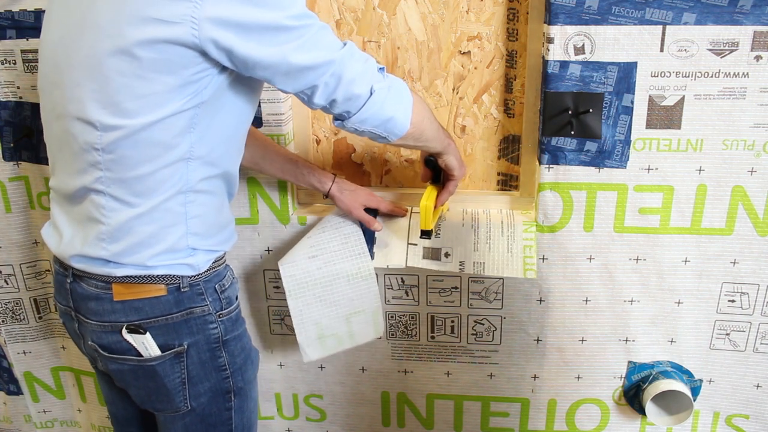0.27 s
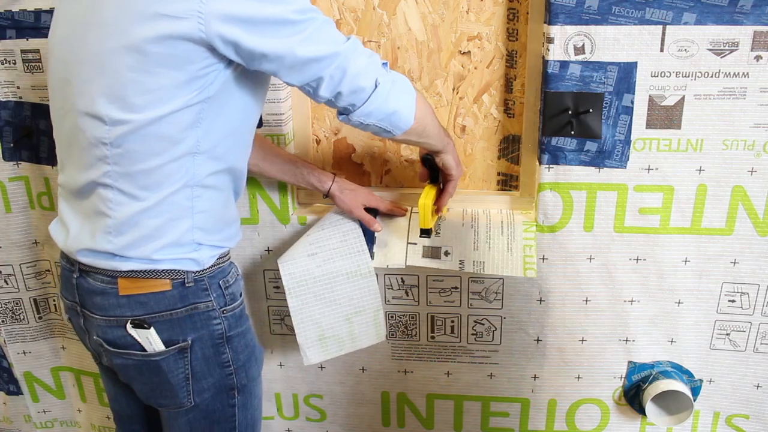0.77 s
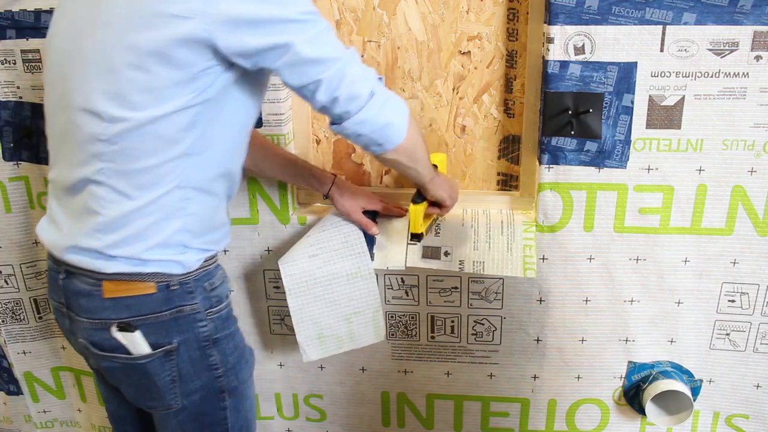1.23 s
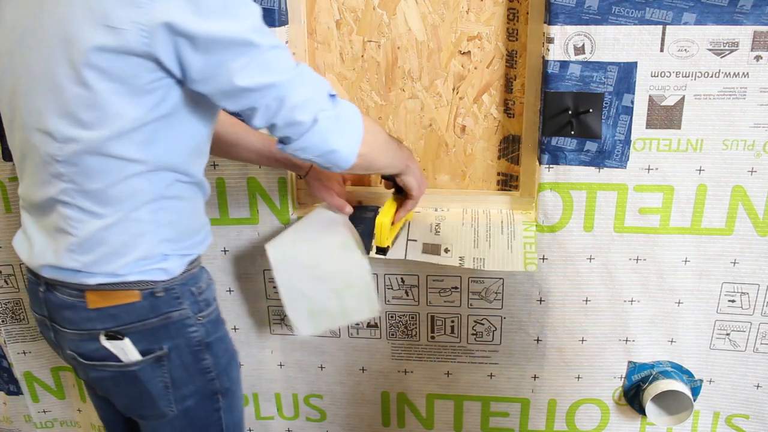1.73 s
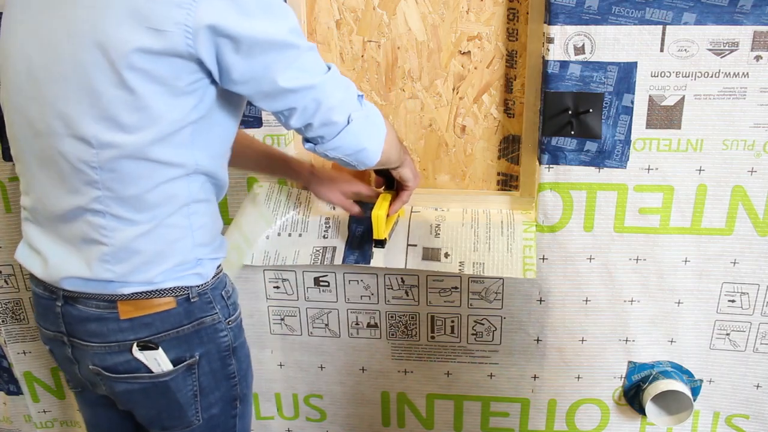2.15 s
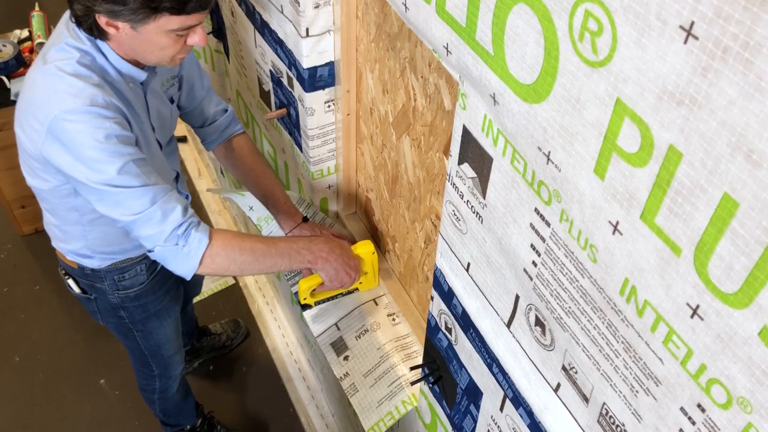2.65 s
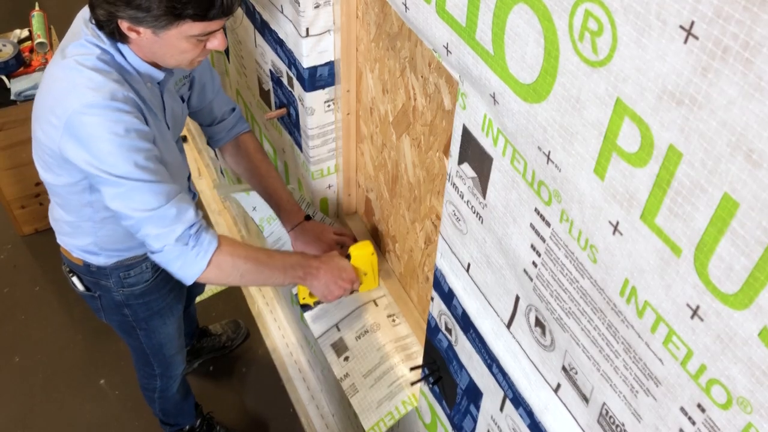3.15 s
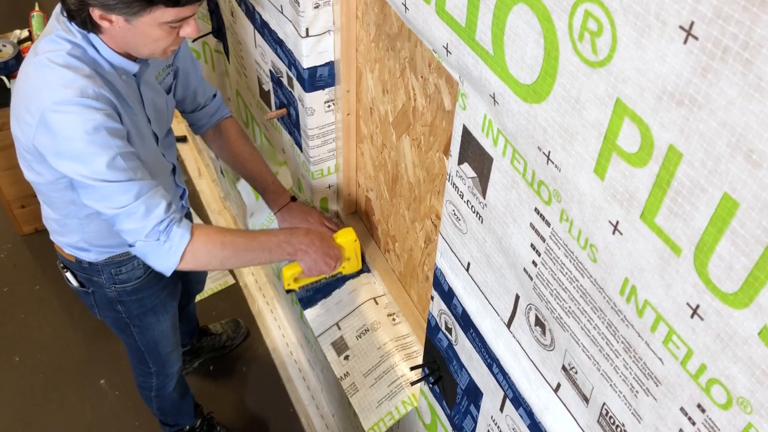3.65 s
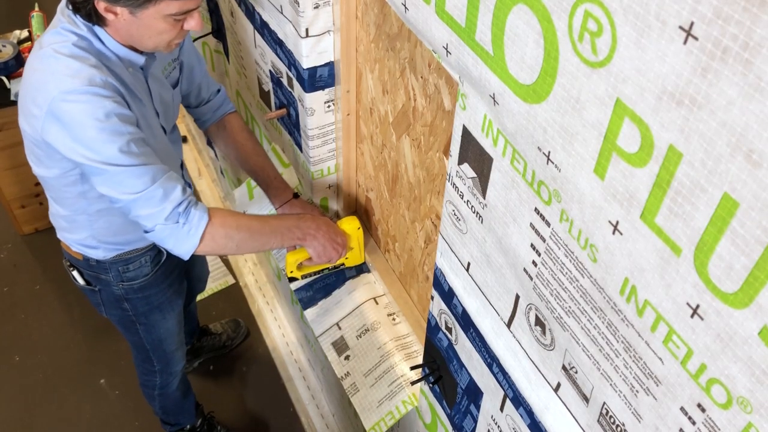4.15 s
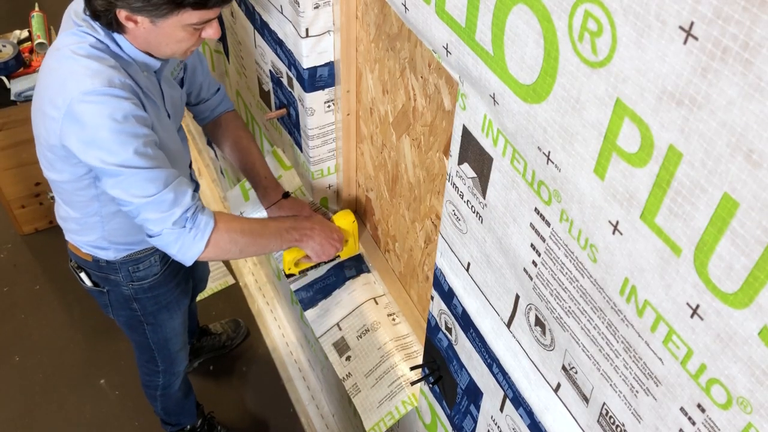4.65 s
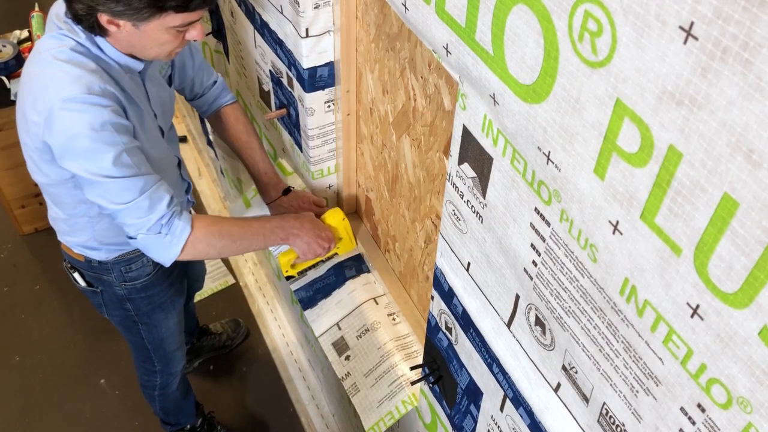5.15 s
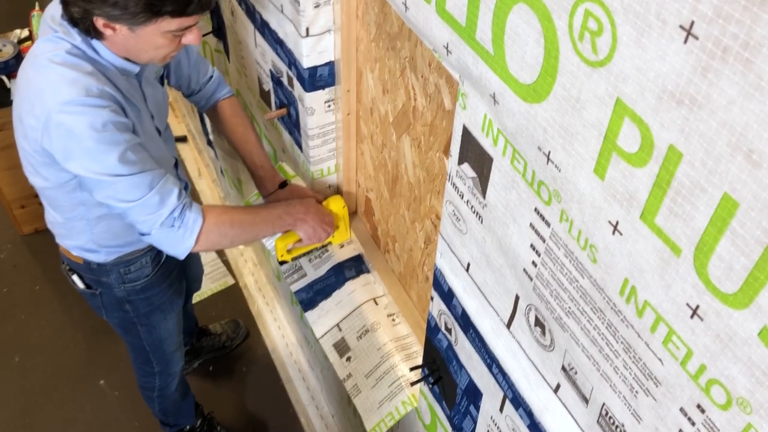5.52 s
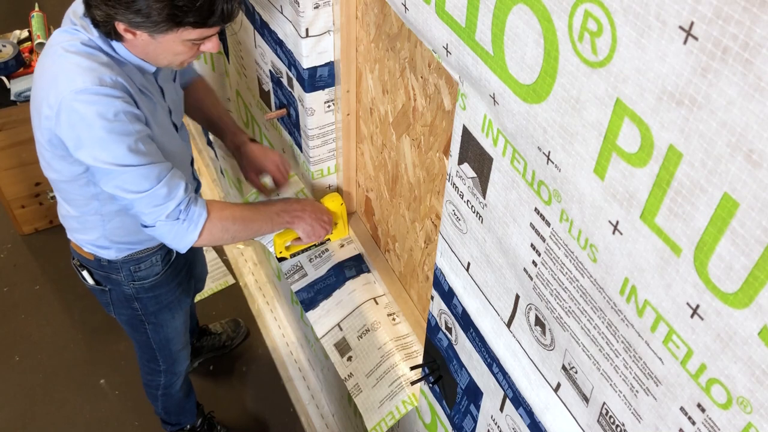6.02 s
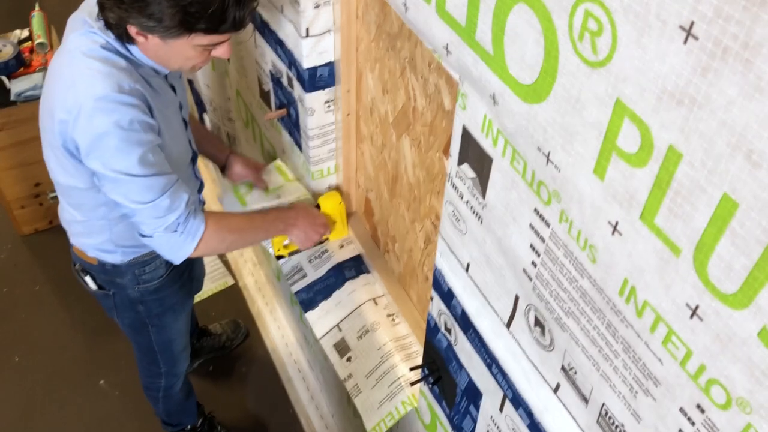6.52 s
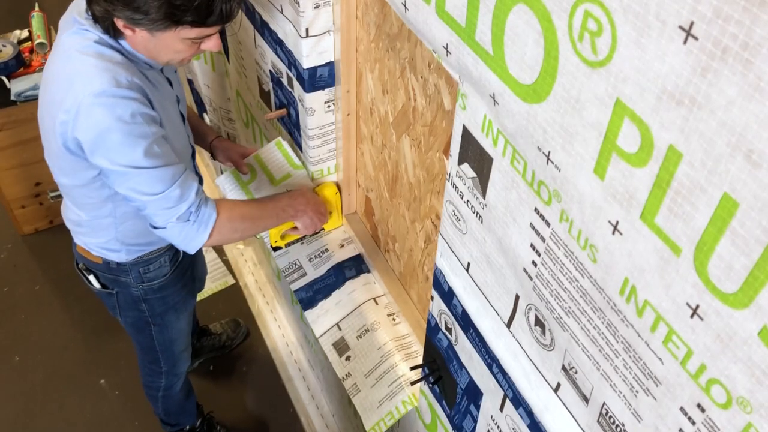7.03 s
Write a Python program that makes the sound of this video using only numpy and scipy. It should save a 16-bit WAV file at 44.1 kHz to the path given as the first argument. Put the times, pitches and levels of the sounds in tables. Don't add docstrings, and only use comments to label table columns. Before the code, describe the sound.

Four very loud staple-gun shots crack into a timber frame, ringing through a bare hall, with small ticks, woody knocks and faint membrane rustle between.

```python
import sys
import numpy as np
from scipy import signal
from scipy.fft import rfft, irfft
from scipy.io import wavfile
from scipy.ndimage import uniform_filter1d

SR = 44100
rng = np.random.default_rng(int(sys.argv[2]) if len(sys.argv) > 2 else 0)


def log_audio(samples):
    frames = np.atleast_2d(samples).T
    limited = np.clip(frames, -1, 1)
    pcm = np.round(limited * 32767).astype(np.int16)
    wavfile.write(sys.argv[1], SR, pcm)


def nominal_scale(level):
    x = np.asarray(level, float) / 20
    return 10 ** x


N = 321489

# frequency in Hz, level in dB per Hz.
CLICK = [(800, -19.5), (2000, 1), (4500, 4), (9000, -4.5), (13000, -14), (16000, -13.5)]


def evened(x):
    return x / np.sqrt(np.mean(x ** 2) + 1e-20)


def peaked(x):
    return x / np.max(abs(x))


def read(points, hz):
    f, value = np.transpose(points)
    return np.interp(np.log(hz + 1), np.log(f + 1), value)


def add(mix, s, sound):
    part = mix[round(s * SR):][:len(sound)]
    part += sound[:len(part)]


def colour(x, points):
    gain = nominal_scale(read(points, np.fft.rfftfreq(len(x), 1 / SR)))
    return irfft(rfft(x) * gain, len(x))


def noise(points, size):
    return evened(colour(rng.standard_normal(size), points))


def uneven(depth_db, size, span):
    drift = uniform_filter1d(rng.standard_normal(size), size=span)
    return nominal_scale(depth_db * evened(drift))


def dull(x, hz):
    return signal.sosfilt(signal.butter(4, hz, fs=SR, output="sos"), x)


def resonate(x, hz, width):
    r = np.exp(-np.pi * width / SR)
    return signal.lfilter([1 - r, 0, r - 1], [1, -2 * r * np.cos(2 * np.pi * hz / SR), r * r], x)


def fade(t60, rise_s, size):
    t = np.arange(size) / SR
    return (1 - np.exp(-t / rise_s)) * nominal_scale(-60 * t / t60)


def engine():
    # time in seconds, cycle in Hz, boom in dB (how fully the seventh order fills the building),
    # drone in dB (the same for the tenth).
    course = [(0, 21.71, 0, 0), (.5, 21.88, 3, 0), (1.1, 21.91, 2.5, 2.5), (1.7, 21.99, 1, 1.5),
              (2.5, 22.28, -0.5, 0), (3.1, 22.16, -2.5, 0.5), (3.698, 21.77, -20, -4.5),
              (4.002, 21.85, -4.5, -7), (4.35, 22.09, -3, -9), (4.8, 22.23, 0.5, -9),
              (5.701, 21.74, -1, -5.5), (6.0, 21.58, 0, -6), (6.25, 22.57, 1.5, -1), (6.85, 21.31, 1, -2.5),
              (7.29, 21.28, -1, -0.5)]
    # multiple of the cycle, level in dB, dB per dB of boom, dB per dB of drone.
    strong_orders = [(7, -50.5, 2, -0.07), (8, -56.5, -0.37, 0.6), (10, -53.5, -0.23, 1.36)]
    # multiple of the cycle, level in dB against order 4.
    weak_orders = [(2, -5), (3, 1.5), (5, 0.5), (6, -12), (9, -0.5), (11, -2.5), (12, -11.5), (13, -9.5),
                   (15, -9.5), (17, -16)]
    base_db = -60.5
    s, *columns = np.transpose(course)
    t = np.arange(N) / SR
    hz, boom_db, drone_db = (uniform_filter1d(np.interp(t, s, c), size=6000) for c in columns)
    orders = [(4, base_db)]
    for k, db, boom_share, drone_share in strong_orders:
        orders.append((k, db + boom_share * boom_db + drone_share * drone_db))
    for k, db in weak_orders:
        orders.append((k, base_db + db))
    turns, out = np.cumsum(hz) / SR, np.zeros(N)
    for k, db in orders:
        waver = np.interp(t, np.arange(40) * 0.2, rng.standard_normal(40))
        phase = 2 * np.pi * (k * turns + rng.random())
        out += np.sqrt(2) * nominal_scale(db + 0.5 * waver) * np.sin(phase)
    return out


def still_air():
    # frequency in Hz, level in dB per Hz.
    hush = [(12, -21.5), (30, -9), (60, -2.5), (120, -16.5), (200, -9.5), (280, -15.5), (350, -15),
            (450, -17), (540, -15), (650, -20), (1000, -18.5), (1800, -25.5), (2300, -32), (3000, -35.5),
            (6000, -39.5), (12000, -44), (16000, -46)]
    return nominal_scale(-55.5) * noise(hush, N)


def slide(length, db, dull_db, end_db, peak, start_db):
    # frequency in Hz, level in dB per Hz.
    sheet = [(1180, -31.5), (2000, -8), (2300, 1), (3310, -1.5), (4650, 1), (6930, -8), (9810, -9),
             (16000, -30)]
    t = np.arange(0, length, 1 / SR)
    creases_per_s = 250
    sizes = nominal_scale(4.0 * np.minimum(rng.exponential(1, len(t)), 4))
    creases = sizes * (rng.random(len(t)) < creases_per_s / SR)
    snaps = signal.fftconvolve(creases, fade(0.012, 0.0002, size=600))[:len(t)]
    fizz = evened(noise(sheet, len(t)) * (1.5 + evened(snaps)))
    drag = evened(resonate(dull(rng.standard_normal(len(t)), hz=2427), 750, 1300))
    speed_db = np.interp(t / length, [0, peak, 1], [start_db, 0, end_db])
    level = nominal_scale(db + speed_db) * signal.windows.tukey(len(t), 0.4)
    level = level * uneven(2.2, len(t), span=900)
    return level * (fizz + nominal_scale(dull_db - 2.0) * drag)


def membrane_strokes(mix):
    # start in seconds, length in seconds, peak in dB, dull part in relative dB, level at end in dB.
    strokes = [(0, .45, -76, 13, -11.5), (1.549, 0.57, -60.5, 10, -7), (1.849, 0.33, -59, 13, -18.5),
               (1.302, .4, -58.5, -4.5, -10), (2.366, .09, -67.5, 5, -7.5), (2.563, .06, -66, 4.5, -5.5),
               (2.625, .045, -69, 7, -6), (5.735, 0.11, -61, -3.5, -8), (6.005, 0.045, -69.5, 11, -8),
               (6.318, 0.058, -59.5, 11, -11.5), (6.38, .06, -65, 5, -9), (6.909, 0.0915, -58, -5, -7.5)]
    for s, *row in strokes:
        add(mix, s, slide(*row, peak=0.17, start_db=-1.5))


def hall(delay_s, linger):
    # frequency in Hz, t60 in seconds.
    decay = [(100, 0.22), (300, 0.89), (600, 0.73), (1400, 0.77), (2500, 0.67), (4000, 0.67), (8000, 0.53),
             (12000, 0.42), (14500, .36), (16000, 0.33)]
    # frequency in Hz, level in dB.
    far_end = [(150, -14), (550, -15.5), (1200, -13), (2400, -11), (5000, -13), (16000, -13.5)]
    hz, t, z = signal.stft(rng.standard_normal(2 * SR), SR, nperseg=256)
    fall_db = -60 * t / linger / read(decay, hz)[:, None]
    late_db = read(far_end, hz)[:, None] + fall_db / 2.54
    patches = uniform_filter1d(rng.standard_normal(z.shape), size=8, axis=0)
    patches = uniform_filter1d(patches, size=5, axis=1)
    z = z * nominal_scale(1.3 * evened(patches))
    tail = signal.istft(z * (nominal_scale(fall_db) + nominal_scale(late_db)), SR, nperseg=256)[1]
    tail *= 1 - np.exp(-(np.arange(len(tail)) / SR / delay_s) ** 2)
    return tail / np.linalg.norm(tail)


def tick(db, hz, ring_db, t60, points):
    hiss = fade(t60, 0.00016, size=4000) * noise(points, size=4000)
    ring = peaked(resonate(hiss, hz, 600))
    return nominal_scale(db) * peaked(peaked(hiss) + nominal_scale(ring_db) * ring)


def handle_ticks(mix):
    # time in seconds, peak in dB, strongest frequency in Hz.
    ticks = [(0.164, -65, 4600), (0.972, -44.5, 4270), (1.0567, -63.5, 4040), (1.0842, -51.5, 4460),
             (1.1223, -59, 9490), (1.152, -45.5, 7330), (2.0587, -49, 4550), (2.1355, -61, 4680),
             (2.952, -49.5, 4420), (3.247, -51.5, 9580), (3.5534, -37, 4750), (4.1686, -52, 5710),
             (4.1848, -46, 5100), (4.3298, -56, 5346), (4.3955, -52, 4650), (4.537, -51.5, 4990),
             (4.6763, -47.5, 2800), (4.9385, -47, 7810), (5.253, -28, 4910), (5.308, -29.5, 3980),
             (5.3345, -51.5, 4230), (5.648, -45, 4350), (5.7855, -57.5, 4200), (6.3867, -51.5, 7440),
             (6.4006, -49, 4820), (6.7998, -31, 4650), (4.222, -55.5, 5000)]
    for s, *row in ticks:
        add(mix, s, tick(*row, ring_db=-1.5, t60=0.016, points=CLICK))


def knock(db, hz, upper_db, t60):
    # factor on the low ring, level in dB.
    ratios = [(1.2, 5), (1.4, -8), (3.9, -10), (1.3, 0.5), (0.63, -3), (1.1, -6)]
    size = 12000
    shake = rng.standard_normal(size)
    press = dull(shake + 10 * signal.unit_impulse(size, idx=260), hz=650)
    drive = fade(0.92 * t60, 0.0042, size) * press
    low = sum(nominal_scale(g) * peaked(resonate(drive, hz * k, 3.8 / t60)) for k, g in ratios)
    contact = dull(shake + 8 * signal.unit_impulse(size, idx=90), hz=2000)
    clack = fade(t60, 0.00096, size) * contact
    upper = 1.4 * resonate(clack, 780, 200) + 0.71 * resonate(clack, 1080, 330)
    upper = upper + 0.15 * resonate(clack, 1900, 500)
    push = fade(0.03, 0.003, size)
    thump = resonate(push, 77, 45) + 1.4 * resonate(push, 180, 90)
    return nominal_scale(db) * (peaked(low) + nominal_scale(upper_db - 0.5) * peaked(upper) + nominal_scale(-11) * peaked(thump))


def frame_knocks(mix):
    # time in seconds, peak in dB, low ring in Hz, upper knock in relative dB, t60 in seconds.
    knocks = [(0.973, -40, 350, -17.5, 0.066), (2.766, -32, 261.9, -28.5, 0.11),
              (3.237, -45.5, 520, -0.5, 0.069), (4.081, -21, 330, -2, 0.041), (4.092, -24, 251, -14.5, 0.1),
              (4.108, -28, 270, -11.5, 0.05), (4.139, -35.5, 170, -14, 0.15), (4.745, -42, 298, -4, 0.066),
              (4.778, -44, 392, -2, 0.13), (4.96, -35.5, 260.5, -19.5, 0.046),
              (5.44, -26.5, 275, -6.5, 0.091), (5.475, -35, 278.4, -12, 0.094),
              (5.538, -35, 270, -13, 0.076), (5.748, -55.5, 496, 9, 0.036), (6.007, -49, 315, -3.5, 0.072),
              (6.325, -39.5, 320, -6, 0.055), (6.45, -35, 290, -9, 0.1), (6.718, -24.5, 337, -4.5, 0.049),
              (6.743, -27.5, 242, -10, .06), (7.047, -35, 160, -20, 0.063), (7.062, -36, 250.3, -9, 0.12),
              (1.905, -41, 330, -7, .07), (1.94, -44, 330, -8, 0.058), (1.152, -45, 381.4, -19, .06)]
    for s, *row in knocks:
        add(mix, s - 0.004, knock(*row))


def spring_ticks(mix):
    # time in seconds, peak in dB, strongest frequency in Hz.
    ticks = [(0.9723, -48.5, 8900), (1.1215, -56.5, 9640), (1.8, -44, 9000), (4.5377, -46.5, 5100),
             (4.539, -53.5, 14010), (4.9382, -55, 13900), (5.335, -63.5, 13000), (5.771, -50, 8600),
             (5.772, -58.5, 13200), (5.787, -54, 12480), (6.389, -54, 9500), (5.1, -52, 9700),
             (6.949, -50.5, 14000), (6.985, -58, 9500), (2.9515, -58, 9500), (2.1355, -58, 10000),
             (1.992, -60, 8000), (1.77, -58, 5000), (2.02, -55, 4100)]
    for s, *row in ticks:
        add(mix, s, tick(*row, ring_db=11.5, t60=0.022, points=CLICK))


def latch_slips(mix):
    # time in seconds, peak in dB, strongest frequency in Hz, ring against hiss in dB, t60 in seconds.
    slips = [
        (1.1934, -18, 5000, -4.5, 0.023),
        (1.1953, -23.5, 4536, 0, 0.021),
        (3.2959, -21.5, 5190, -10, .04),
        (4.999, -24, 4000, -14.5, 0.048),
        (6.4477, -26.5, 4306, -21.5, 0.073),
    ]
    # frequency in Hz, level in dB per Hz.
    scrape = [(470, -22), (800, -8.5), (1220, -2.5), (3880, -1), (4450, -0.5), (5790, -1.5), (6400, -11.5),
              (7160, -2), (16000, -24.5)]
    for s, *row in slips:
        add(mix, s, tick(*row, scrape))


def driver_flight(db):
    # frequency in Hz, level in dB per Hz.
    guide = [(300, -41), (900, -9.5), (1800, 5), (4000, -3.5), (7000, -19.5), (16000, -34)]
    return nominal_scale(db) * fade(0.03, 0.0002, size=2000) * noise(guide, size=2000)


def struck_frame(blow, t60, build_s, modes):
    size = len(blow)
    shake = rng.standard_normal(size)
    push = fade(t60, build_s, size) ** 2
    thud = dull(signal.unit_impulse(size, round(build_s * SR)), hz=790)
    board = dull(shake, hz=950) * push + 7 * thud
    rail = dull(shake, hz=960) * fade(t60, 0.002, size) ** 2
    rattle = dull(shake, hz=5000) * blow
    ring = np.zeros(size)
    for hz, width, db in modes:
        drive = board if hz < 420 else rail if hz < 700 else rattle
        ring += nominal_scale(db) * peaked(resonate(drive, hz, 1.4 * width))
    return peaked(ring)


def steel_crack(blow, close):
    snap = 1 + 0.78 * fade(0.0088, 0.00033, len(blow))
    return peaked(blow * snap * noise(close, len(blow)))


def frame_lurch(share, db, size):
    push = fade(0.047, 0.002, size)
    return share * nominal_scale(-db) * peaked(resonate(push, 60, 92))


def panel_boom(hz, db, size):
    push = fade(0.04, 0.0097, size)
    return nominal_scale(db) * peaked(resonate(resonate(push, hz, 77), hz, 120))


def wall_echoes(mix, dry):
    # delay in seconds, level in dB.
    walls = [(.012, -19), (0.034, -16), (.046, -18.5), (0.06, -17.5)]
    # frequency in Hz, level in dB.
    wall_loss = [(200, -1), (3000, -5.5), (7000, -3), (16000, -13)]
    for s, echo_db in walls:
        add(mix, s, nominal_scale(echo_db) * colour(dry, wall_loss))


def hall_answer(dry, ring, far, sings, linger):
    wet_db = -9.5
    tail = hall(0.017, linger)
    wash = colour(tail, far) * fade(4.8, 0.0031, len(tail))
    wash = wash * uneven(1.3, len(tail), span=250)
    wash = wash + sum(nominal_scale(g) * resonate(wash, hz, width) / 2 for hz, width, g in sings)
    answer = nominal_scale(wet_db) * np.linalg.norm(dry) * wash / np.linalg.norm(wash)
    return answer + nominal_scale(wet_db - 17) * signal.fftconvolve(tail, ring)[:len(answer)]


def shot(db, crack_db, t60, build_s, hold_s, modes, close, far, sings, linger, lurch, boom):
    size = 12000
    held = np.minimum(np.arange(size) / SR, hold_s)
    blow = fade(t60, 0.00027, size) * nominal_scale(60 * held / t60)
    ring = struck_frame(blow, t60, build_s, modes)
    dry = ring + nominal_scale(crack_db) * steel_crack(blow, close)
    out = hall_answer(dry, ring, far, sings, linger)
    add(out, 0, dry + frame_lurch(lurch, db, size))
    add(out, 0, panel_boom(*boom, size))
    wall_echoes(out, dry)
    return nominal_scale(db) * out


def staple_shots(mix):
    # time in seconds, peak before overload in dB, crack against ring in dB, rattle t60 in seconds,
    # board build-up in seconds.
    shots = [
        (1.2074, 8, 3, 0.036, 0.0039),
        (3.3103, 9.5, 3.5, 0.036, 0.018),
        (5.0230, 6.5, 4, 0.045, .010),
        (6.4792, 6.5, 4, 0.033, 0.013),
    ]
    # lead in seconds, level in dB against the blow.
    flights = [(.0018, -16), (.0022, -17), (.0027, -21), (.0023, -21)]
    holds = [0.0045, 0.0038, 0.005, 0.0077]
    # frequency in Hz, width in Hz, level in dB.
    rings = [
        [(330, 11, -9.5)] + [(443, 25, 7.5), (820, 30, 0.5), (1154, 27, -5.5), (1738, 19, -2.5), (2610, 140, 6), (3660, 46, -13.0), (3740, 92, -2.0)],
        [(330, 22, -5), (520, 41, 5.0)] + [(602.0, 14, 1), (1190, 21, -9.5), (1800, 85, -8.0), (2034, 56, 0.5), (2410, 79, -1.5), (3165, 120, -11.5), (3100, 130, -6.5)],
        [(414.0, 21, -9.5), (494.8, 25, -10.5)] + [(320.0, 17, -5.5), (1400, 78, -9), (1740, 33, -7.5), (2210, 26, -15.0), (2590, 62, -9.5), (2819, 150, -10), (3480, 100, -9.0), (3664, 40, -16.0)],
        [(878.3, 53, -3.0), (1240.4, 31, 3)] + [(330, 18, -1), (465.0, 43, -1), (596, 40, 1.5), (1274, 41, 1), (1900, 46, 4), (1590, 53, -2), (2220, 53, -9.5), (2880, 92, -15.5), (2780, 25, -21.0), (3900, 30, -23.0)],
    ]
    # frequency in Hz, level in dB per Hz.
    cracks = [
        [(470, -29), (800, -12), (1440, -4.5), (1760, -2), (2870, -0.5), (5300, -10), (9670, -15), (16000, -28)],
        [(470, -44), (800, -8), (2150, 3.5), (2440, -0.5), (3780, -3), (4230, -5.5), (10600, -17.5),
         (16000, -28)],
        [(470, -41), (800, -9.5), (1650, -1.5), (2150, -10), (2800, 3), (4020, -12.5), (8640, -19.5),
         (16000, -33.5)],
        [(470, -42), (800, -13), (1270, -5.5), (2000, -6), (2500, -14), (3830, -10), (5170, -18),
         (12700, -31.5), (16000, -35.5)],
    ]
    # frequency in Hz, level in dB per Hz.
    returns = [
        [(47, -49), (80, -20), (190, -18), (289, -10), (394, -9.5), (490, 0), (657, -12.5), (819, -8),
         (1560, -9), (2540, -10.5), (4500, -16), (6580, -22.5), (9800, -25.5), (16000, -41.5)],
        [(47, -51.5), (80, -18), (232, -11.5), (277, -8.5), (515, -1), (717, -16), (876, -4), (1000, -7.5),
         (2370, -4), (3100, -10), (4610, -13.5), (11200, -29.5), (16000, -41)],
        [(47, -46.5), (80, -23), (104, -6), (242, -9), (302, -7), (784, -5.5), (1000, -12), (1430, -5.5),
         (2170, -7.5), (2700, -7), (4510, -19.5), (8030, -21.5), (16000, -39)],
        [(47, -47), (80, -13.5), (194, -7), (248, -12.5), (296, -13.5), (717, -6), (1000, -12.5), (1250, -6.5),
         (1390, -8), (1900, -7.5), (2600, -13.5), (6730, -22), (16000, -37.5)],
    ]
    # frequency in Hz, width in Hz, level in dB over the wash.
    sings = [
        [(2290, 380, 3.5), (2520, 160, 4), (840, 69, 2.5)],
        [(2320, 60, 7), (566, 130, 3.5), (1450, 60, 0.5), (2020, 65, -0.5)],
        [(2690, 140, 7), (3550, 70, 4), (1400, 52, -1.5), (320, 27, 1)],
        [(1862, 110, 4.5), (1210, 70, 2), (330, 65, 1.5), (780, 60, 0)],
    ]
    lingers = [1.02, 1.005, .99, 1]
    lurches = [0.066, -0.05, .02, 0.044]
    # frequency in Hz, level in dB against the blow.
    booms = [(170, -25), (149, -24.5), (110, -20), (100, -22.5)]
    places = zip(holds, rings, cracks, returns, sings, lingers, lurches, booms)
    for (s, db, *row), (lead_s, flight_db), place in zip(shots, flights, places):
        add(mix, s - lead_s, driver_flight(db + flight_db))
        add(mix, s, shot(db, *row, *place))


def handle_taps(mix):
    # time in seconds, peak in dB, strongest frequency in Hz.
    taps = [
        (3.238, -46, 699),
        (5.443, -27.5, 3920),
        (5.7437, -40, 1250),
        (6.008, -47.5, 1500),
        (6.326, -48.5, 2200),
    ]
    # frequency in Hz, level in dB per Hz.
    plastic = [(400, -13), (1200, -1), (4000, -0.5), (9000, -11), (16000, -28.5)]
    for s, *row in taps:
        add(mix, s, tick(*row, ring_db=-5.5, t60=0.022, points=plastic))


def membrane_pulls(mix):
    # start in seconds, length in seconds, peak in dB, dull part in relative dB, level at end in dB.
    pulls = [
        (4.422, .27, -62, 6, -4.5),
        (4.705, .1, -60, 5, -2),
        (4.789, 0.22, -72, 5, -2.5),
    ]
    for s, *row in pulls:
        add(mix, s, slide(*row, peak=0.45, start_db=-11))


def scene():
    out, small = engine() + still_air(), np.zeros(N)
    membrane_strokes(small)
    handle_ticks(small)
    frame_knocks(small)
    spring_ticks(small)
    latch_slips(small)
    staple_shots(out)
    handle_taps(small)
    membrane_pulls(small)
    room = signal.fftconvolve(small, hall(0.028, 0.97))[:N]
    return (out + small + nominal_scale(-14.5) * room)[None]


def top_cut(x):
    return signal.sosfilt(signal.butter(12, 15750, fs=SR, output="sos"), x)


def record(dry):
    clipped = np.clip(dry, -1, 1)
    return top_cut(clipped)


dry = scene()
out = record(dry)
log_audio(out)
```